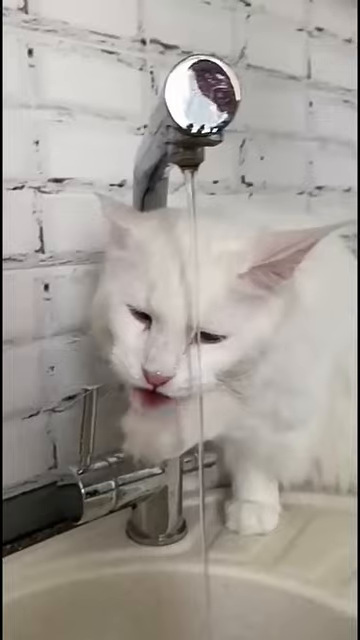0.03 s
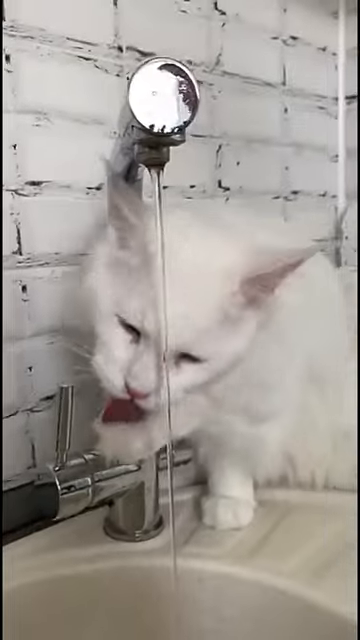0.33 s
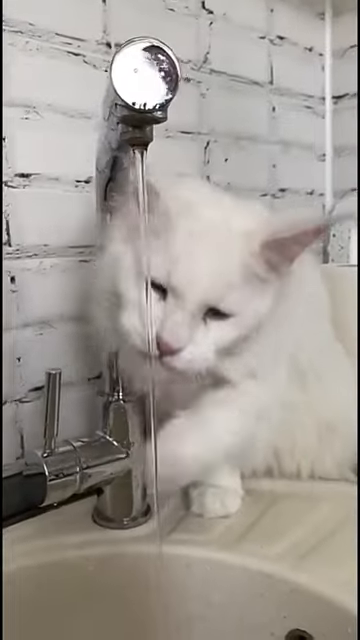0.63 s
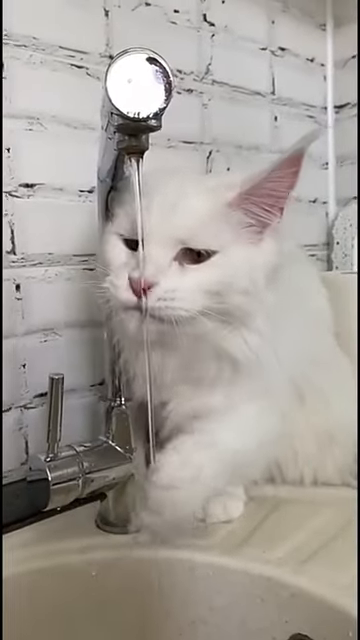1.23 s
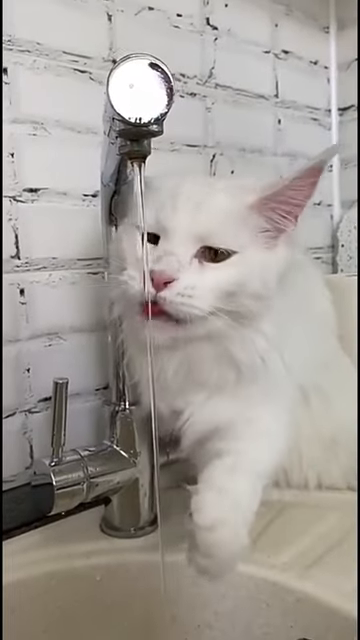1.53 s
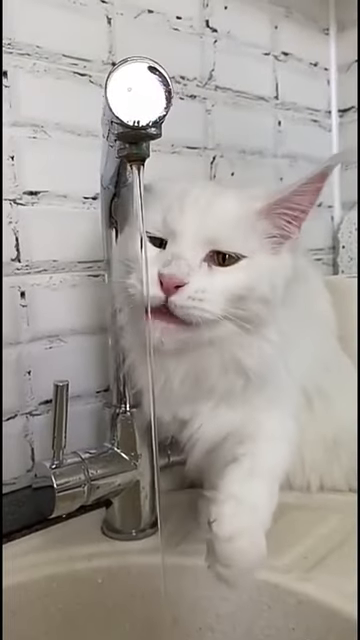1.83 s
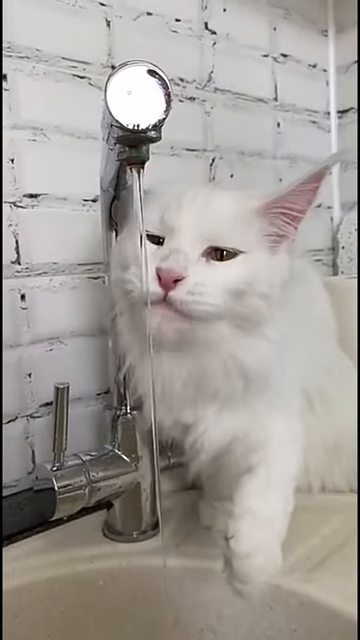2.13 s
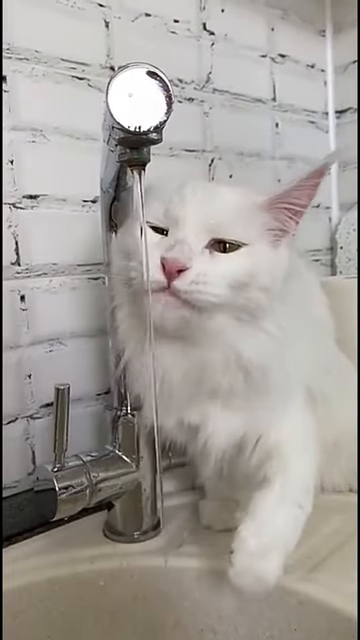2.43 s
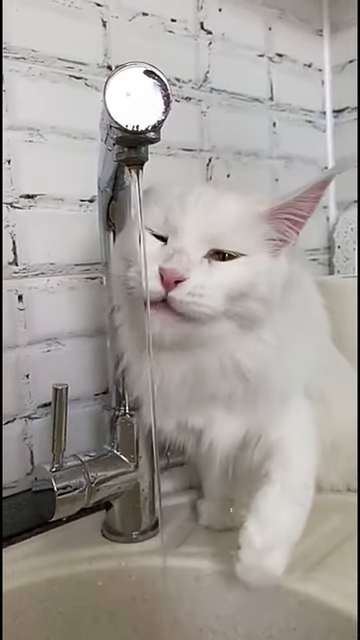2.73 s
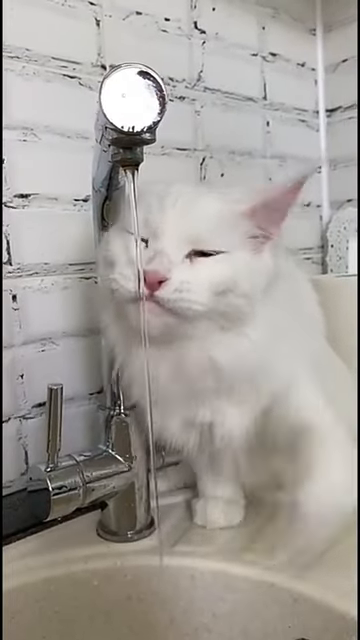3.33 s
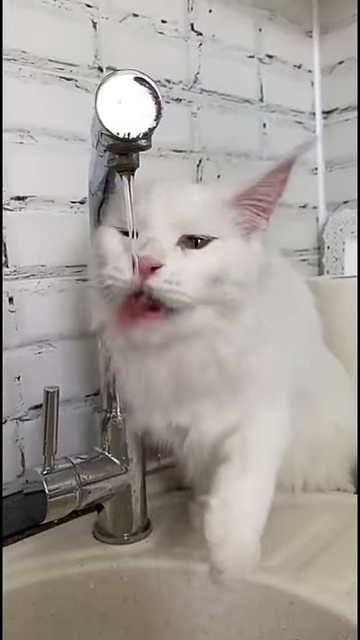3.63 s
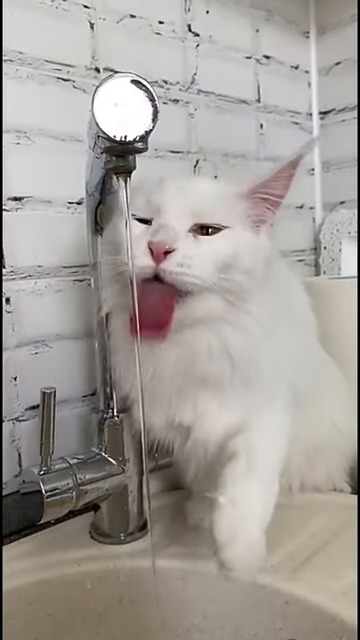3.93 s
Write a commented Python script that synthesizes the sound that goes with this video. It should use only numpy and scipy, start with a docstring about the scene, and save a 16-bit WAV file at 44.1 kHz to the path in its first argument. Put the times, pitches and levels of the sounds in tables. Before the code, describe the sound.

A thin stream of tap water patters into a stone sink throughout, close up, with a fine hiss and small burbling bubbles. A cat's tongue and stray drops make irregular wet ticks, the sharpest near 4 seconds. From about 1.3 seconds, occasional heavier drips plop on the right. A low building rumble lies underneath, and a faint distant engine climbs in pitch from about 2.5 seconds.

```python
"""Cat lapping at a running tap.

Close up at a stone sink in a tiled room, on a stereo microphone. A thin stream patters into the basin:
its droplets hiss, small bubbles burble, the cat's tongue and stray drops smack and tick, and heavy
drips knock on the stone to the right. Under it lies the building's low rumble, in which a distant
engine speeds up."""
import sys
import numpy as np
from scipy import signal
from scipy.fft import rfft, irfft, next_fast_len
from scipy.io import wavfile

SR = 44100
rng = np.random.default_rng(int(sys.argv[2]) if len(sys.argv) > 2 else 0)


def output_pcm(signal):
    """Save a mono or channel-first signal as 16-bit PCM at the path in sys.argv[1].

    Samples are clipped to [-1, 1] before scaling.
    """
    pcm = np.clip(np.atleast_2d(signal).T, -1, 1) * 32767
    wavfile.write(sys.argv[1], SR, np.round(pcm).astype(np.int16))


N = 176400
TIME = np.arange(N) / SR
FFT_SIZE = next_fast_len(N + SR)
FREQS = np.maximum(np.arange(FFT_SIZE // 2 + 1) * SR / FFT_SIZE, 1)

# How strongly the stream burbles. Each row: time in seconds, relative level in dB.
BURBLE_STRENGTH = [(.15, 4), (.6, 3.5), (.75, -4.5), (1.0, 4.5), (1.13, 2.5), (1.22, -23), (1.5, -12.5),
                   (1.66, 6), (1.87, -2.5), (2.05, 1), (2.2, -20), (2.32, 1), (2.52, -6), (2.95, -1.5),
                   (3.1, -4), (3.27, 0.5), (3.4, 1), (3.58, 6), (3.85, -3)]


def spray(droplets_per_s=9000, spread_db=3, level_db=-36.5):
    """Thousands of droplets a second hit the sink, hissing and keeping a few resonances ringing."""
    # The flow of the stream. Each row: time in seconds, relative level in dB.
    flow = [(.15, -1.5), (.6, 0), (1.0, 0), (1.4, 0.7), (2.0, 0), (2.45, 0), (2.85, 0), (3.4, -0.5),
            (3.9, -1)]
    # The hiss as heard, with a deep notch cut near 8 kHz.
    # Each row: frequency in Hz, relative spectral level in dB.
    heard_spectrum = [(300, -10), (420, -10.5), (700, -6.5), (1000, -9), (1400, -8), (1750, -12.5),
                      (2300, -14.5), (2900, -16), (3450, -8.5), (3900, -15.5), (4500, -8.5), (5250, -1),
                      (5750, -6.5), (6250, -5.5), (7000, -22), (8000, -59), (8800, -14.5), (9700, -9),
                      (12000, -13), (12800, -15), (14200, -16), (15100, -8.5), (16000, -32)]
    # Narrow resonances under the spray. Each row: frequency in Hz, width in Hz, level in dB.
    resonances = [(414.3, 62, -50), (537, 24, -55.5), (4962, 56, -49.5), (5246, 120, -47.5),
                  (6165, 75, -54), (6440, 90, -49.5), (8310, 46, -50), (10535, 136, -50)]
    sizes = from_db(spread_db * np.minimum(rng.exponential(1, N), 6)) * rng.choice([-1, 1], N)
    landings = rng.random(N) < droplets_per_s / SR
    hits = sizes * landings * from_db(0.7 * drift(rate_hz=20))
    hiss = filtered(hits, from_db(at_hz(heard_spectrum)) * steep_cut(15500))
    out = from_db(level_db) * rms_one(hiss)
    # The midrange follows a quarter of the burble's swing in dB.
    mids = filtered(out, 1 / (1 + ((FREQS - 2770) / 1600) ** 4))
    burble_db, = in_time(BURBLE_STRENGTH)
    out += mids * (from_db(0.25 * (burble_db - burble_db.mean())) - 1)
    for hz, width, db in resonances:
        response = 1 / (1 + 1j * (FREQS - hz ** 2 / FREQS) / (2 * width)) ** 2
        waver_db = 2 * drift(rate_hz=9)
        out += from_db(db + waver_db) * rms_one(filtered(hits, response))
    flow_db, = in_time(flow)
    return out * from_db(flow_db)


def bubble(hz):
    """One bubble: a faint splash opens it and the trapped air rings."""
    return pip(hz, swell_s=0.0022) + from_db(-12) * splash(band_hz=(950, 2500), decay_s=0.0053)


def burble(bubbles_per_s=100, pitch_range_hz=(1322, 1504), base_db=-45, spread_db=2.5):
    """Small bubbles form at random where the stream lands, with large ones among them."""
    # The largest bubbles. Each row: start in seconds, pitch in Hz, peak level in dB.
    large_bubbles = [(0.2137, 1470, -27.5), (0.268, 1500, -34), (0.3097, 1495, -26.5),
                     (0.3247, 1500, -30.5), (0.4037, 1510, -33), (0.47, 1450, -33), (0.4871, 1486, -37),
                     (0.521, 1459, -31.5), (0.536, 1415, -36), (0.5709, 1440, -28), (0.634, 1400, -32.0),
                     (0.9402, 1380, -28.0), (0.9757, 1400, -29), (1.1047, 1490, -33), (1.6102, 1462, -29),
                     (1.645, 1446, -29.5), (1.6747, 1420, -27.5), (1.7424, 1495, -25.5),
                     (1.799, 1420, -28.5), (1.809, 1380, -36), (1.9837, 1480, -31.5), (2.014, 1500, -34.5),
                     (2.0483, 1470, -28), (2.096, 1476, -34.5), (2.278, 1474, -32.5), (2.2892, 1440, -27.5),
                     (2.3454, 1465, -29.5), (2.4207, 1510, -32.5), (2.6293, 1435, -29.0),
                     (2.8037, 1420, -25), (2.9553, 1380, -25.5), (2.9695, 1400, -23.5),
                     (3.0084, 1366, -34.5), (3.1972, 1380, -26), (3.2076, 1340, -24), (3.2523, 1440, -29),
                     (3.2671, 1427, -20), (3.287, 1420, -25), (3.4974, 1376, -24.5), (3.5099, 1343, -33.0),
                     (3.5382, 1370, -29), (3.554, 1460, -29), (3.5894, 1466, -28), (3.6026, 1464, -38),
                     (3.6266, 1465, -26.5), (3.6485, 1490, -28.5), (3.9722, 1410, -20),
                     (3.9882, 1398, -26.5)]
    out = np.zeros(N)
    for start, hz, db in large_bubbles:
        add(out, start, from_db(db) * bubble(hz))
    strength_db, = in_time(BURBLE_STRENGTH)
    forms = rng.random(N) < bubbles_per_s / SR
    pitch_hz = rng.uniform(*pitch_range_hz, N)
    peak_db = base_db + strength_db + spread_db * rng.standard_normal(N)
    for i in np.flatnonzero(forms):
        add(out, TIME[i], from_db(peak_db[i]) * bubble(pitch_hz[i]))
    return out


def smacks(body_hz=3420, snap_decay_s=0.0014, rebound_s=0.0012, gain_db=2):
    """Tongue and stray drops smack: a bright snap with one rebound, a wet crack, a body and a ring."""
    # Each row: start in seconds, ring pitch in Hz, then relative levels of body, ring and snap in dB.
    laps_and_drops = [(0.2686, 5840, -48, -46, -15), (.3093, 5450, -26, -9.5, -11),
                      (0.419, 5330, -41, -43, -19.5), (.561, 5250, -29, -45, -45),
                      (.633, 5050, -42, -24.5, -36), (.9745, 5170, -30, -38, -49),
                      (1.124, 5000, -20, -25.5, -36), (1.1365, 5330, -24, -20, -39),
                      (1.35, 5340, -50, -31, -28), (1.5295, 5300, -35, -27, -17),
                      (1.5345, 5500, -29, -22, -23), (1.547, 5300, -45, -39, -20),
                      (1.645, 5300, -40, -38, -21), (1.809, 5300, -45, -32, -28),
                      (1.9116, 4900, -25, -15, -15), (1.941, 5200, -41, -32, -24),
                      (2.0964, 4960, -53, -31, -12.5), (2.201, 5270, -51, -37, -21),
                      (2.4074, 5100, -24.5, -38, -46), (2.728, 5430, -49, -26, -29),
                      (2.804, 5340, -43, -33, -25), (2.970, 5250, -31, -22.5, -23),
                      (3.007, 5440, -40, -33, -12.5), (3.2067, 4800, -39, -28, -9),
                      (3.281, 5240, -42, -30, -20.5), (3.497, 4986, -39, -32, -14),
                      (3.537, 6060, -48, -21, -12), (3.5555, 5020, -43, -18.5, -33),
                      (3.628, 5450, -51, -39, -10.5), (3.651, 5100, -25, -42, -31),
                      (3.945, 5190, -45, -30, -16), (3.9713, 4940, -10.5, -4.5, -9)]
    # The colour of the snap. Each row: frequency in Hz, relative spectral level in dB.
    snap_colour = [(5000, -14), (6500, -2), (7600, -7), (9000, -0.5), (11000, -2.5), (12500, -3),
                   (13800, -5), (15000, -10), (17000, -41)]
    tones, snaps = np.zeros((2, N))
    t = TIME[:SR // 40]
    for start, hz, body_db, ring_db, snap_db in laps_and_drops:
        ring = pip(hz, swell_s=0.0009)
        crack = from_db(-19) * splash(band_hz=(2600, 7400), decay_s=0.0025)
        body = pip(body_hz, swell_s=0.00092)
        add(tones, start, from_db(ring_db) * (ring + crack) + from_db(body_db) * body)
        snap = from_db(-13) * rng.standard_normal(len(t)) * np.exp(-t / snap_decay_s)
        snap[0] += 1  # the first click
        snap[int(rebound_s * SR)] += from_db(5)  # its louder rebound
        add(snaps, start, from_db(snap_db) * snap)
    response = from_db(at_hz(snap_colour))
    return from_db(gain_db) * (tones + filtered(snaps, response / response.mean()))


def drips(attack_s=0.005, spread_db=1):
    """Each heavy drip lands with a hollow plop and rings the basin's low modes in a mix of its own."""
    # Each row: start in seconds, plop pitch in Hz, level in dB.
    heavy_drips = [(1.268, 660, -31), (1.611, 654, -21.5), (2.1905, 690, -22.5), (2.236, 636, -29.5),
                   (2.518, 700, -24.5), (3.040, 666, -31), (3.144, 626, -32), (3.686, 736, -26.5)]
    # The stone basin's modes. Each row: frequency in Hz, relative level in dB, seconds to fall 60 dB.
    basin_modes = [(544.3, -4.5, 0.11), (592, -13.5, 0.055), (707, -23, 0.072), (950, -16, 0.031)]
    out, t = np.zeros(N), TIME[:SR // 4]
    for start, plop_hz, db in heavy_drips:
        knock = np.zeros(len(t))
        for hz, mode_db, t60 in basin_modes:
            struck_db = mode_db + spread_db * rng.standard_normal()
            knock += from_db(struck_db - 60 * t / t60) * np.sin(2 * np.pi * hz * t)
        add(out, start, from_db(db) * pip(plop_hz, swell_s=0.0014))
        add(out, start, from_db(db) * knock * np.minimum(t / attack_s, 1))
    return out


def spatter(drops_per_s=28, low_hz=2920, high_hz=6900, level_db=-43.5, spread_db=5):
    """Drops thrown off the stream land with faint pips of scattered pitch."""
    out = np.zeros(N)
    landings = rng.random(N) < drops_per_s / SR
    pitch_hz = low_hz * (high_hz / low_hz) ** rng.random(N)
    peak_db = level_db + spread_db * rng.standard_normal(N)
    for i in np.flatnonzero(landings):
        add(out, TIME[i], from_db(peak_db[i]) * pip(pitch_hz[i], swell_s=0.0009))
    return out


def engine(overtone_db=-19):
    """A far-off engine speeds up: a low drone with one overtone climbs in pitch."""
    # Each row: time in seconds, pitch in Hz, RMS level of the fundamental in dB.
    run_up = [(2.1, 38, -66), (2.35, 42, -63), (2.6, 47.58, -39.5), (2.77, 51.86, -31.5),
              (3.0, 57.66, -34.5), (3.27, 62.57, -33.5), (3.4, 65.84, -40), (3.55, 71, -32.5),
              (3.75, 78.8, -35.5), (3.95, 83.6, -48)]
    hz, db = in_time(run_up)
    phase = 2 * np.pi * np.cumsum(hz) / SR
    return np.sqrt(2) * from_db(db) * (np.sin(phase) + from_db(overtone_db) * np.sin(2 * phase))


def rumble(base_db=-37.5):
    """Low noise of the building, nearly alike left and right."""
    # The rumble's colour. Each row: frequency in Hz, relative spectral level in dB.
    colour = [(20, -14.5), (30, -24), (42, -9), (60, 3.5), (80, -3.5), (90, -6.5), (104, -5.5), (135, -14),
              (190, -15), (235, -22.5), (320, -23.5), (500, -25), (1000, -102)]
    # Its stereo width. Each row: frequency in Hz, side level against the mid in dB.
    width = [(60, -38), (120, -12.5), (250, -10), (500, 0)]
    # Its slow rise and fall. Each row: time in seconds, relative level in dB.
    swell = [(.15, 1), (1.1, 1), (1.5, -1.5), (2.0, 2), (2.5, -1), (3.0, -1), (3.6, 1), (4.0, 1.5)]
    mid, side = rms_one(filtered(rng.standard_normal((2, N)), from_db(at_hz(colour))))
    side = filtered(side, from_db(at_hz(width)))
    swell_db, = in_time(swell)
    return from_db(base_db + swell_db) * (mid + side * [[1], [-1]])


def hum():
    """The building's noise swells in a few low resonances."""
    # Each row: frequency in Hz, half-width in Hz, level in dB before the swell.
    resonances = [(103.2, 9, -47.5), (169.7, 7, -55.5), (199, 12.5, -52.5)]
    # The hum's rise and fall. Each row: time in seconds, relative level in dB.
    swell = [(.15, -1), (1.6, -0.5), (2.15, 4.5), (2.5, -1.5), (3.4, 1.5), (4.0, 1)]
    out, noise = np.zeros(N), rng.standard_normal(N)
    for hz, half_width, db in resonances:
        response = 1 / (1 + ((FREQS - hz) / half_width) ** 2)
        out += from_db(db) * rms_one(filtered(noise, response))
    swell_db, = in_time(swell)
    return from_db(swell_db) * out


def room(x, wet_db, t60_s=0.084, first_echo_s=0.00314, side_db=-2):
    """Direct sound plus the short, dense ring of tiled walls, in stereo."""
    decay = from_db(-60 * TIME / t60_s) * (TIME > first_echo_s)
    mid, side = rng.standard_normal((2, N)) * decay
    tail = mid + from_db(side_db) * side * [[1], [-1]]
    tail /= np.sqrt(np.sum(tail ** 2) / 2)
    return x + from_db(wet_db) * filtered(x, rfft(tail, FFT_SIZE))


def pip(hz, swell_s):
    """A small air pocket rings, swelling to a peak of 1 and dying within milliseconds."""
    t = TIME[:SR // 40]
    age = t / swell_s
    return (age * np.exp(1 - age)) ** 2 * np.sin(2 * np.pi * (hz * t + rng.random()))


def splash(band_hz, decay_s):
    """A short, dying burst of spray."""
    t = TIME[:SR // 40]
    band = signal.butter(2, band_hz, "band", fs=SR, output="sos")
    return rms_one(signal.sosfilt(band, rng.standard_normal(len(t)))) * np.exp(-t / decay_s)


def from_db(db):
    """Decibels to gain."""
    return 10 ** (np.asarray(db) / 20)


def rms_one(x):
    """Scale to unit power."""
    return x / np.sqrt(np.mean(x ** 2) + 1e-20)


def in_time(rows):
    """Each column of a table over time, read at every sample."""
    seconds, *columns = np.transpose(rows)
    return [np.interp(TIME, seconds, column) for column in columns]


def at_hz(rows):
    """A table over frequency, read at every bin."""
    hz, value = np.transpose(rows)
    return np.interp(np.log(FREQS), np.log(hz), value)


def filtered(x, response):
    """Pass a sound through a frequency response."""
    return irfft(rfft(x, FFT_SIZE) * response, FFT_SIZE)[..., :N]


def steep_cut(hz):
    """Response of a very steep low-pass."""
    return 1 / np.sqrt(1 + (FREQS / hz) ** 160)


def drift(rate_hz):
    """A slow random wander of unit power."""
    return rms_one(filtered(rng.standard_normal(N), 1 / (1 + (FREQS / rate_hz) ** 2)))


def add(out, start_s, sound):
    """Mix a short sound in at a time."""
    i = int(np.clip(start_s * SR, 0, N - 1))
    out[i:i + len(sound)] += sound[:N - i]


def pan(db):
    """Left and right gains for a level difference; negative leans right."""
    return from_db(np.array([[.5], [-.5]]) * db)


def lag_right(x, radians):
    """Hold the right channel back by a phase at each frequency."""
    return filtered(x, np.exp(1j * radians * np.array([[0], [-1]])))


def scene(cat_lag_s=0.00001):
    """Water and cat in the tiled room, the cat's mouth a touch nearer the left microphone."""
    cat = lag_right(room(smacks(), wet_db=-15), 2 * np.pi * FREQS * cat_lag_s)
    water = room(spray() + spatter() + burble(), wet_db=-7)
    water = filtered(water, pan(-7 / (1 + (FREQS / 800) ** 8)))  # the basin's low notes lie right
    knocks = room(drips(), wet_db=-8) * pan(-6)
    return water + cat + knocks + rumble() + hum() + engine()


def record(dry, start_s=0.138, fade_in_s=0.0063, cutoff_hz=16700):
    """Two microphone ports differ in phase; the sound cuts in, any overload clips, the top is cut."""
    # Each row: frequency in Hz, phase by which the left port leads the right in radians.
    port_phase = [(550, 0), (750, .9), (1250, 0), (2300, 0), (3200, .8), (3700, .4), (4300, 1), (4800, .35),
                  (5500, .4), (6300, 1.7), (6950, 3.05), (7950, 3.25), (9000, 4.9), (9800, 6.2),
                  (11600, 6.4), (12000, 7.9), (12800, 9.3), (14200, 9.55), (15000, 10.7), (15600, 12.4)]
    ports = lag_right(dry, at_hz(port_phase))
    fade_in = np.clip((TIME - start_s) / fade_in_s, 0, 1)
    return filtered(np.clip(ports * fade_in, -1, 1), steep_cut(cutoff_hz))


dry = scene()
out = record(dry)
output_pcm(out)
```